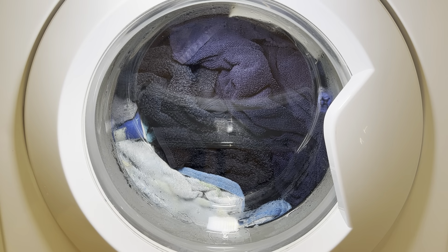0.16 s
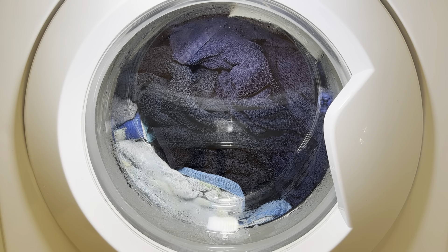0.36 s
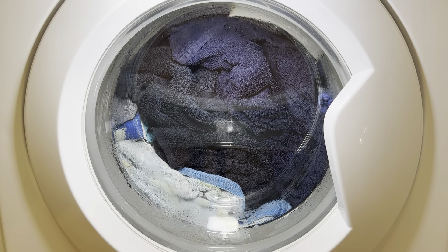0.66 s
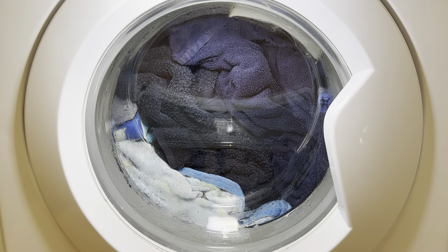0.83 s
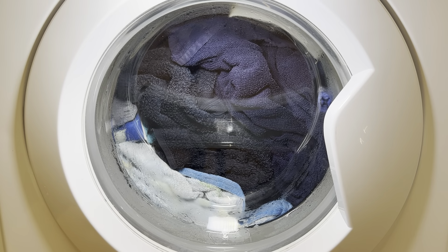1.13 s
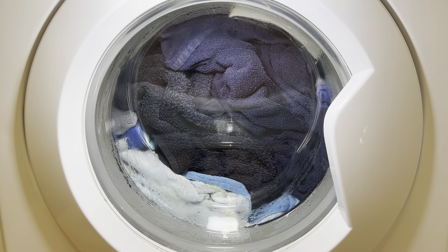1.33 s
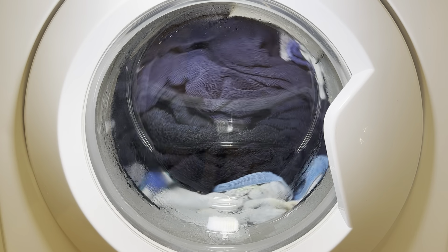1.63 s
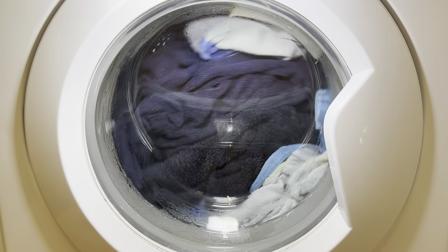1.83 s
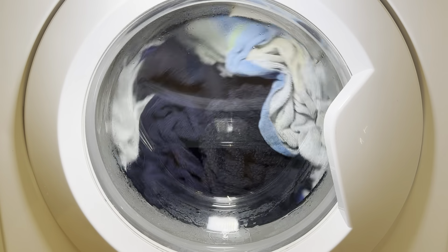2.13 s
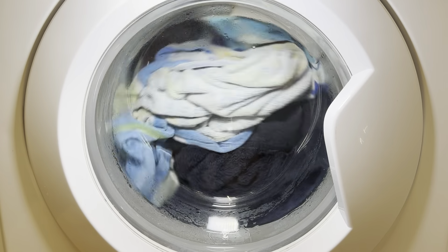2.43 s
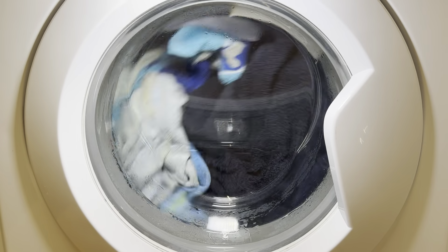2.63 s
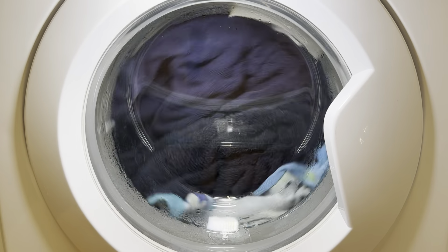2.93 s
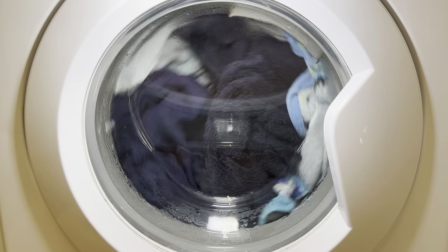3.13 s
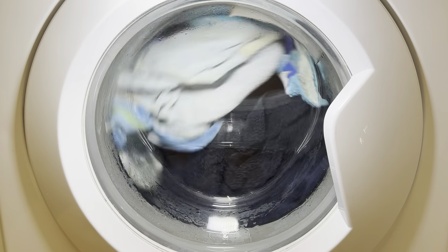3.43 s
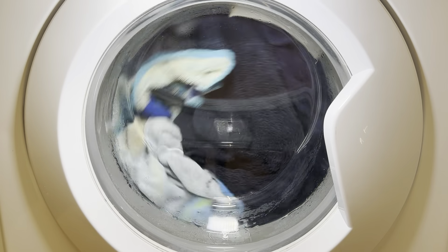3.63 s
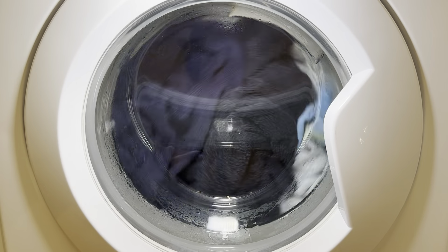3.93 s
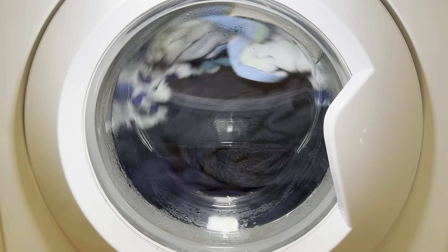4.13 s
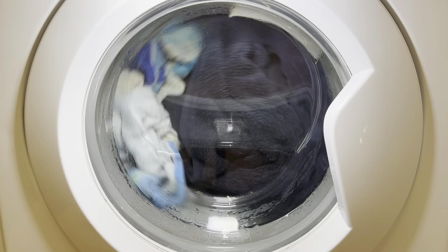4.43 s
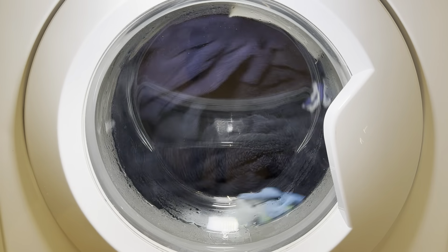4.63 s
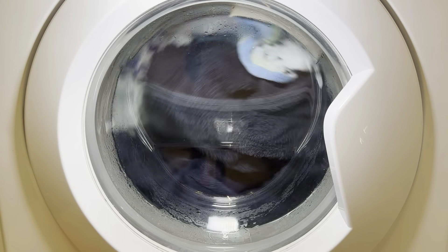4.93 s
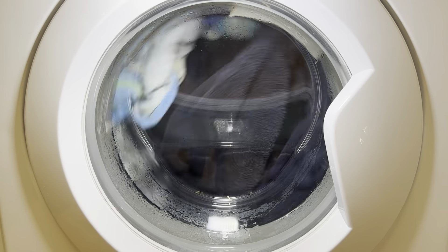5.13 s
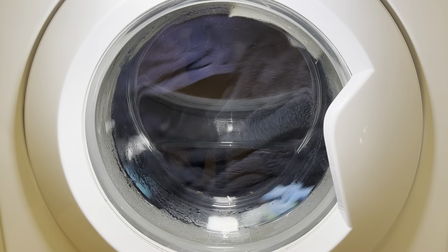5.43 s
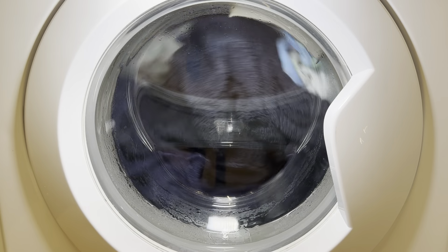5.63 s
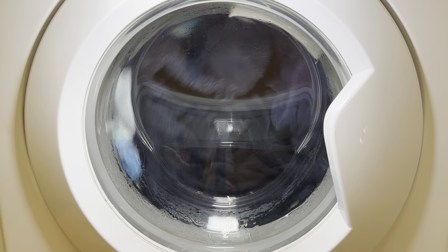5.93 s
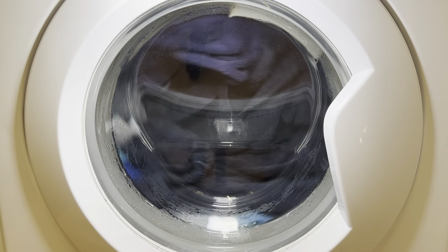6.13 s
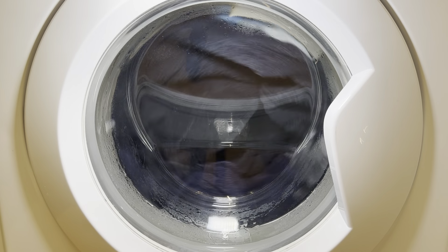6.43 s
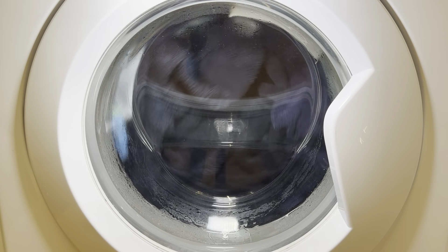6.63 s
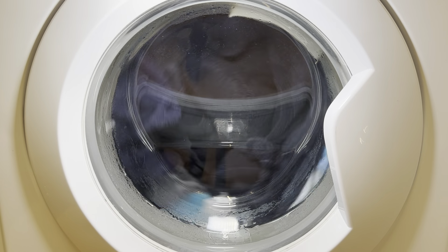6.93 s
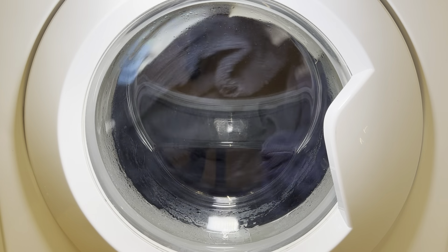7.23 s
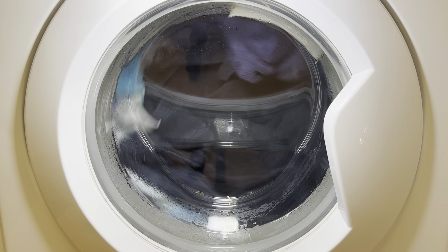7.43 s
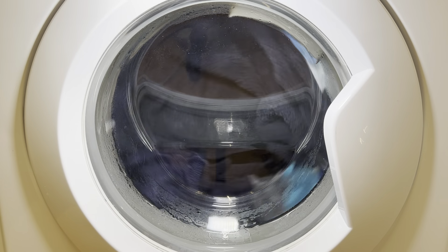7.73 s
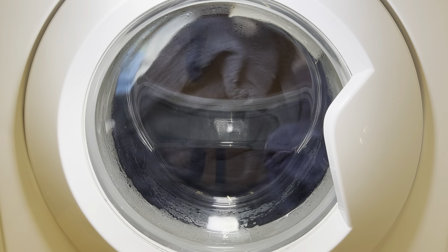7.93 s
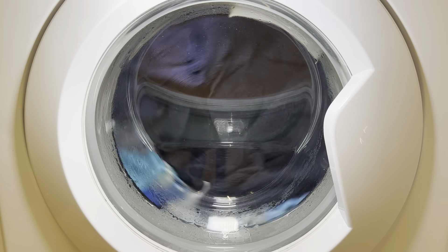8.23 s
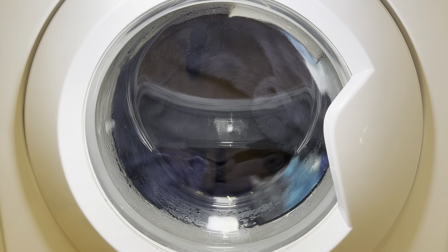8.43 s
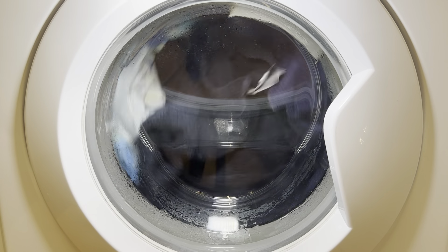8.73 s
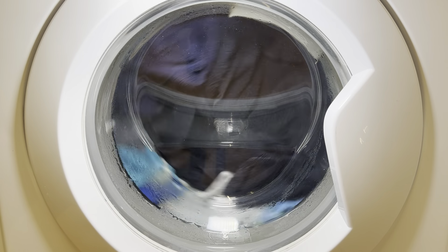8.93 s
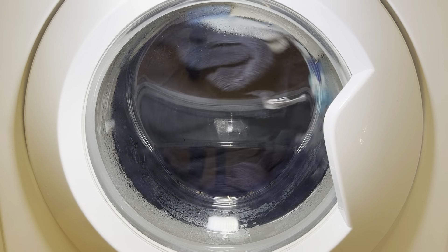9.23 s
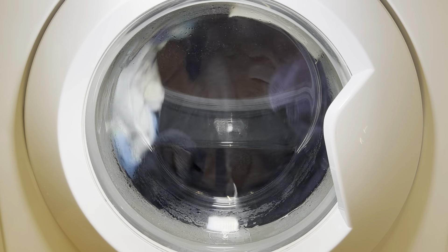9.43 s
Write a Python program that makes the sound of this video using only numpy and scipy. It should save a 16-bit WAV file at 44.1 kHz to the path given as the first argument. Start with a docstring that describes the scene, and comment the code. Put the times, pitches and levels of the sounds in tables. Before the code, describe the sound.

A laundry drum starts up, heard close in a small indoor room. First comes a low electric hum, airflow and a metallic latch clack, then a jolt and scrape. Cloth slaps, slides and thuds rhythmically against steel, with little zip taps and panel groans. A faint whine rises as the motor speeds up. After a rough knock halfway, the hum is stronger and steadier, until the load finally softens.

```python
"""A front-loading tumble dryer, with the microphone close to its door in a small room.
At rest it hums on mains harmonics in a rush of air, while a latch clacks and hard parts ring.
At 0.78 s the drum jolts round: filtered noise swishes and thuds at each roll, over deep booms,
and a faint motor whine climbs through a panel's resonance. From five seconds on the mains hum is
much louder, after a knock and clatter; near the end the laundry falls quiet."""
import sys
import numpy as np
from scipy import signal
from scipy.fft import rfft, irfft
from scipy.io import wavfile

SR = 44100
rng = np.random.default_rng(int(sys.argv[2]) if len(sys.argv) > 2 else 0)


def dump(signal):
    """Clip the signal to [-1, 1] and save it as 16-bit WAV at the path in sys.argv[1]."""
    limited = np.clip(np.atleast_2d(signal).T, -1, 1)
    pcm = np.round(limited * 32767).astype(np.int16)
    wavfile.write(sys.argv[1], SR, pcm)


N = 422478
TIME = np.arange(N) / SR
BINS_HZ = np.maximum(np.arange(N // 2 + 1) * SR / N, 1)
SIDES = np.array([[1], [-1]])  # left, right

MAINS_HZ = 49.95
START_S, LOAD_S, LULL_S = 0.78, 4.95, 9.39  # drum starts; full load comes on; laundry falls quiet

# the load rolls over about once a turn and is then lifted again:
# (t/s, spread of the swell/s, delay of the lift/s, boom level/dB, thud level/dB, slap level/dB)
LOAD_ROLLS = [(1.3, 0.095, 0.3, -48, -37, -43.5), (2.06, 0.096, .26, -50, -40, -44),
              (2.77, 0.061, 0.2, -51, -40, -42), (3.44, 0.092, 0.41, -47, -41.5, -43.5),
              (4.08, 0.083, .39, -46, -47, -46.5), (4.77, 0.072, 0.33, -42, -45, -44.5),
              (5.451, 0.097, 0.24, -44, -56, -46), (6.15, 0.084, .25, -46, -42, -46.5),
              (6.78, 0.11, 0.19, -44, -38.5, -46), (7.469, .075, .27, -43, -41.5, -46),
              (8.119, 0.096, 0.17, -45, -41, -47), (8.759, 0.093, 0.25, -45, -58, -50.5),
              (9.34, 0.077, .4, -53, -48, -53)]
# resonances of the cabinet's panels and cavities: (f/Hz, width/Hz, level/dB)
CABINET_MODES = [(112.4, 11.7, 14), (153, 4.8, -1.5), (179, 3.2, 13.5), (195, 3.3, -7), (263, 23, 10),
                 (291.8, 5.3, 11), (376, 8.3, 9), (359, 8.8, 9.5), (524, 25, 1.5), (622, 8.5, 1.5),
                 (804, 96, 0.5), (950, 17, 4)]
# resonances of the steel drum: (f/Hz, width/Hz, level/dB)
DRUM_MODES = [(918, 19, 7), (1183, 36, 3), (1261, 20, 9), (1650, 7.2, -4), (1557, 5.3, 9.5),
              (2035, 10.3, 16), (2168, 90, 13.5), (2470, 27, 9.5), (2626, 18, 6.5), (3160, 410, 3.5),
              (6300, 250, 3.5)]


def from_db(db):
    """Decibels to gain."""
    return 10 ** (np.asarray(db) / 20)


def rms_one(x):
    """Scale to unit rms."""
    return x / np.sqrt(np.mean(x ** 2) + 1e-20)


def in_time(rows):
    """Each column of a curve, sample by sample."""
    s, *columns = np.transpose(rows)
    return [np.interp(TIME, s, c) for c in columns]


def colour(points):
    """Gain at every frequency from (f/Hz, level/dB) points, straight on a log frequency axis."""
    hz, db = np.transpose(points)
    return from_db(np.interp(np.log(BINS_HZ), np.log(hz), db))


def resonances(modes):
    """Gain of a body whose modes stand out of a flat response."""
    power = 1
    for hz, width_hz, db in modes:
        power = power + from_db(db) ** 2 / (1 + (2 * (BINS_HZ - hz) / width_hz) ** 2)
    return np.sqrt(power)


def band(low_hz, high_hz):
    """Gain of a band with steep skirts."""
    return 1 / np.sqrt((1 + (low_hz / BINS_HZ) ** 8) * (1 + (BINS_HZ / high_hz) ** 8))


def peak_gain(hz, width_hz):
    """Gain of a narrow peak, for noise that whistles."""
    return 1 / (1 + (2 * (BINS_HZ - hz) / width_hz) ** 2)


def drift(rate_hz):
    """Slow chance with spread 1: noise that falls away above the rate."""
    spectrum = rfft(rng.standard_normal(N)) / (1 + (BINS_HZ / rate_hz) ** 2) ** 2
    return rms_one(irfft(spectrum, N))


def ramp(start_s, rise_s):
    """A step from 0 to 1."""
    return np.clip((TIME - start_s) / rise_s, 0, 1)


def burst(start_s, rise_s, t60):
    """A quick rise and an exponential fall (t60 in s)."""
    return ramp(start_s, rise_s) * from_db(-60 * np.maximum(TIME - start_s, 0) / t60)


def swell(centre_s, spread_s):
    """A smooth rise and fall of height 1."""
    return np.exp(-0.5 * np.minimum(((TIME - centre_s) / spread_s) ** 2, 100))


def flops(per_s=22, t60=0.28):
    """Folds of cloth land at random moments: each a sudden rise that dies away (t60 in s)."""
    landings = (rng.random(N) < per_s / SR) * np.minimum(rng.exponential(1, N), 2)
    return signal.lfilter([1], [1, -from_db(-60 / (t60 * SR))], landings + 1e-18)


def room_ripple(depth_db=2.6, grain_hz=22):
    """Overlapping reflections leave fine peaks and dips in a spectrum, deepening up to 4 kHz."""
    steps = np.interp(BINS_HZ / grain_hz, np.arange(4000), rng.standard_normal(4000))
    return from_db(depth_db * steps * np.clip(BINS_HZ / 4000, 0, 1))


def stereo_noise(gain, grain_db=0):
    """Coloured stereo noise, its width differing from band to band; grain makes the level flicker."""
    # left-right difference against their sum: (f/Hz, level/dB)
    side_colour = [(60, -67), (150, -12.5), (300, -11.5), (500, -2), (1000, -2), (1800, 2), (2300, -12.5),
                   (3200, -5), (4800, -4.5), (5800, 4.5), (7200, 10.5), (9500, -16.5), (12600, 13.5),
                   (15500, 1)]
    # left over right: (f/Hz, level/dB)
    left_over_right = [(100, 0), (200, -2), (400, 0.5), (650, -6.5), (1300, 2), (2500, 0), (5000, -3.5),
                       (9000, 0)]
    grains = rng.standard_normal((2, N)) * from_db(grain_db * drift(180))
    paths = np.array([room_ripple(), room_ripple() * colour(side_colour)])
    mid, side = irfft(rfft(grains) * gain * paths, N)
    pair = np.array([mid + side, mid - side]) / np.std(mid)
    lean = np.sqrt(colour(left_over_right))
    return irfft(rfft(pair) * np.array([lean, 1 / lean]), N)


def whine(hz, db, apart=0.65):
    """A thin tone that reaches the two sides out of step (apart in radians)."""
    phase = 2 * np.pi * np.cumsum(hz) / SR
    return np.sqrt(2) * from_db(db) * np.cos(phase + apart * SIDES)


def hum_strength(rest_db=-40.5, turning_db=-44, loaded_db=-32, flutter_db=0.8, steady_flutter_db=0.76):
    """The hum steps with the motor's state and surges whenever the load pulls on it."""
    # the motor strains against the shifting load: (t/s, spread/s, level/dB)
    hum_surges = [(.99, 0.063, -34.5), (1.355, 0.046, -33), (1.51, 0.022, -40), (1.61, 0.051, -37.5),
                  (2.11, 0.037, -31.5), (2.27, 0.048, -38), (2.38, 0.032, -35.5), (2.85, 0.019, -39),
                  (3.02, 0.061, -35), (3.38, .02, -54), (3.72, 0.034, -41), (3.81, 0.026, -40),
                  (4.22, 0.048, -39), (4.35, 0.031, -42), (4.46, 0.014, -36), (4.93, .025, -40),
                  (5, 0.011, -32), (5.08, 0.042, -34), (5.75, 0.076, -35.5), (6.38, .13, -46),
                  (6.97, 0.14, -43), (7.72, 0.084, -35), (8.42, 0.094, -40), (8.95, 0.034, -39),
                  (9.1, 0.026, -33)]
    turning, loaded = ramp(START_S, 0.054), ramp(LOAD_S, 0.14)
    unsettled = turning - loaded
    base = from_db(rest_db) * (1 - turning) + from_db(turning_db) * unsettled + from_db(loaded_db) * loaded
    surges = sum(from_db(db) * swell(s, spread_s) for s, spread_s, db in hum_surges)
    return (base + surges) * from_db((steady_flutter_db + flutter_db * unsettled) * drift(22))


def motor_hum(waver_db=3.0, sway=0.23, shake=0.41, spread=0.23, lag=0.039):
    """Magnetic hum on mains harmonics; the swaying cabinet makes the overtones waver (angles in radians)."""
    # overtones: (multiple of the mains, level at rest/dB, level turning/dB, level under full load/dB)
    overtones = [(3, -42.5, -50, -47), (4, -43.5, -55.5, -52), (5, -58, -53.5, -52), (6, -53.5, -51, -52),
                 (7, -60, -61, -52), (10, -82, -56, -56.5)]
    phase = 2 * np.pi * MAINS_HZ * TIME
    turning, loaded = ramp(START_S, 0.067), ramp(LOAD_S, 0.037)
    unsettled = turning - loaded
    # the hum's main tone lies at twice the mains frequency
    unrest = (shake + 0.41 * unsettled) * drift(4.7)
    out = hum_strength() * np.cos(2 * phase + unrest - lag * SIDES)
    motion = 0.35 + 0.65 * turning
    for multiple, rest_db, turn_db, load_db in overtones:
        level_db = rest_db * (1 - turning) + turn_db * unsettled + load_db * loaded
        wander = sway * multiple * motion * drift(5.6) + rng.uniform(0, 2 * np.pi)
        apart = spread * multiple / 4 * SIDES
        gain = from_db(level_db + waver_db * motion * drift(5.9))
        out = out + gain * np.cos(multiple * phase + wander + apart)
    return np.sqrt(2) * out


def idle_drone(waver_db=1.5):
    """Low tones beat against the hum until the drum starts."""
    # tones between the hum's overtones: (f/Hz, level/dB)
    idle_tones = [(125.4, -52), (180, -53)]
    tones = 0
    for hz, db in idle_tones:
        tone = np.sin(2 * np.pi * hz * TIME + rng.uniform(0, 2 * np.pi))
        tones = tones + from_db(db + waver_db * drift(3)) * tone
    return np.sqrt(2) * tones * (1 - ramp(START_S, 0.068))


def airflow(rush_db=-44, lull_db=-2, whistle_db=-74, whistle_from_s=4, whistle_hz=5100, whistle_width_hz=130):
    """Rush of air through the drum, with a thin whistle that fades in from the fourth second."""
    # broad colour of the rush under the drum's resonances: (f/Hz, level/dB)
    air_colour = [(25, -12), (60, 2.5), (120, 6), (175, 11.5), (230, -5.5), (330, 4.5), (480, -9),
                  (1000, -15), (2800, -22), (5000, -25), (7200, -37.5), (9000, -23.5), (11500, -33.5),
                  (15500, -54)]
    rush = stereo_noise(colour(air_colour) * resonances(DRUM_MODES), grain_db=1.0)
    whistle = stereo_noise(peak_gain(whistle_hz, whistle_width_hz))
    rush_gain = from_db(rush_db + lull_db * ramp(LULL_S, 0.07))
    return rush_gain * rush + from_db(whistle_db) * ramp(whistle_from_s, 1) * whistle


def knocks(tail=0.45, tail_t60=0.16, width_hz=300, rise_s=0.0008):
    """Hard parts tap the drum and cabinet: a sharp ring on one pitch, then a blurred tail from the room."""
    # knocks on the drum and cabinet: (t/s, level/dB, ring f/Hz, ring t60/s)
    taps = [(.066, -36, 2144, 0.037), (.077, -40, 1266, 0.14), (.093, -45, 2100, 0.055),
            (.118, -46, 1250, 0.1), (.96, -42, 2140, .08), (1.564, -45, 653, .12), (2.7, -37, 2215, 0.054),
            (2.742, -42, 2160, .07), (2.935, -46, 2200, .15), (4.96, -43, 975, 0.092),
            (4.994, -45, 2140, 0.089), (5.457, -41, 2250, 0.075), (6.41, -47, 2130, 0.09),
            (6.715, -47, 2180, .12), (8.805, -44, 2100, .09), (8.92, -49, 1260, .1), (8.974, -45, 780, .09),
            (9.12, -43.5, 914, 0.092), (9.549, -46, 2000, 0.064)]
    out, length = np.zeros((2, N)), SR // 3
    for s, db, hz, t60 in taps:
        span = slice(int(s * SR), int(s * SR) + length)
        age = np.arange(len(TIME[span])) / SR
        peak = signal.iirpeak(hz, hz / width_hz, fs=SR)
        noise = rng.standard_normal((2, len(age)))
        blur = signal.lfilter(*peak, signal.lfilter(*peak, noise))
        blur = rms_one(blur[0] + 1.3 * blur[1] * SIDES)  # sum and difference
        attack = np.minimum(age / rise_s, 1)
        ring = np.sqrt(2) * np.sin(2 * np.pi * hz * age) * attack * from_db(-60 * age / t60)
        out[:, span] += from_db(db) * (ring + tail * blur * from_db(-60 * age / tail_t60))
    return out


def start_up(clack_db=-38, rattle_db=-53, jolt_db=-39, scrape_db=-45.0, scrape_hold_s=0.066, scrape_release_s=0.18):
    """A latch clacks, rebounds and rattles faintly, then the drum jolts into motion and the load scrapes free."""
    # resonances of the latch: (f/Hz, width/Hz, level/dB)
    latch_modes = [(755, 140, 22), (1020, 200, -1), (1290, 150, 13.5), (1560, 160, 3), (2170, 150, 17),
                   (3200, 220, 8.5)]
    throw = burst(0.069, 0.012, 0.28) + 0.5 * burst(0.11, 0.002, 0.056)
    latch = from_db(clack_db) * throw * stereo_noise(band(470, 3700) * resonances(latch_modes))
    shiver = np.sin(np.pi * ramp(0.21, 0.59)) * (1 + 0.17 * np.cos(2 * np.pi * MAINS_HZ * TIME))
    rattle = from_db(rattle_db) * shiver * stereo_noise(band(950, 4400) * resonances(latch_modes))
    jolt_noise = stereo_noise(band(100, 270) * resonances(CABINET_MODES))
    jolt = from_db(jolt_db) * burst(0.777, 0.004, 0.92) * jolt_noise
    slip = ramp(0.777, 0.0032) - ramp(START_S + scrape_hold_s, scrape_release_s)
    scrape = from_db(scrape_db) * slip * stereo_noise(band(480, 1360), grain_db=1.5)
    return latch + rattle + jolt + scrape


def ticks(t60=0.059, tail=0.39, tail_t60=0.2):
    """A tiny bright tick with a short room tail."""
    # contacts switching: (t/s, level/dB)
    contacts = [(0.613, -48), (4.957, -54)]
    blows = 0
    for s, db in contacts:
        blows = blows + from_db(db) * (burst(s, 0.001, t60) + tail * burst(s, 0.005, tail_t60))
    ring = band(9600, 11000) * resonances([(10000, 1000, 3.6), (15400, 980, 4.4)])
    return blows * rms_one(irfft(rfft(rng.standard_normal(N)) * ring, N))


def groans(flutter_hz=14):
    """A side panel swells into resonance for a moment."""
    # the cabinet groans when the load pulls on it: (t/s, spread/s, level/dB, centre f/Hz)
    pulls = [(.8, 0.017, -31.5, 164), (.88, 0.027, -32, 172.8), (.96, 0.022, -35, 195),
             (1.41, 0.015, -34, 178), (1.61, 0.02, -36, 178), (1.86, 0.03, -37, 195.7),
             (2.11, 0.067, -38.5, 205), (2.23, 0.055, -33, 181), (2.6, .05, -40, 200),
             (4.9, 0.03, -37, 181), (5.75, 0.017, -41, 178), (6.35, 0.14, -41, 175.5),
             (6.85, 0.12, -40.5, 177.2), (8.92, 0.065, -38, 178.6)]
    out = 0
    for s, spread_s, db, hz in pulls:
        tone = np.sin(2 * np.pi * hz * TIME + rng.uniform(0, 2 * np.pi))
        out = out + from_db(db) * swell(s, spread_s) * tone
    return out * (1 + 0.2 * drift(flutter_hz))


def laundry(weight_db=-42.5, rub_db=-57, flop=0.41, buzz=0.067, lurch_db=0.62,
            first_slide_s=0.85, first_spread_s=0.1, first_weight_db=-43, first_rub_db=-58,
            roll_rub_db=-67, thud_after_s=0.047, thud_spread_s=0.06, lull_rumble_db=-6, lull_rub_db=-13):
    """The load's weight shakes the cabinet while cloth and zips rub along the steel drum, most at each roll."""
    # broad colours under the resonances of cabinet and drum: (f/Hz, level/dB)
    rumble_colour = [(30, -26), (50, 0), (85, -2.5), (120, -7.5), (175, -3.5), (225, -11.5), (300, -3.5),
                     (400, -4), (550, -10.5), (850, -12), (1100, -32), (2000, -59)]
    swish_colour = [(400, -34), (900, 3.5), (1400, 1.5), (1800, 6), (2500, 4), (3300, 4.5), (5000, 4),
                    (5600, -3.5), (7200, -14), (8500, 1), (11000, -4.5), (13000, -27), (16000, -9)]
    slide, lull = swell(first_slide_s, first_spread_s), ramp(LULL_S, 0.24)
    drag = from_db(rub_db) * (0.5 + 0.5 * ramp(START_S, 0.87))  # grows as the drum gathers speed
    thuds, rub = 0, drag + from_db(first_rub_db) * slide
    for s, spread_s, _, _, thud_db, _ in LOAD_ROLLS:
        thuds = thuds + from_db(thud_db) * swell(s + thud_after_s, thud_spread_s)
        rub = rub + from_db(roll_rub_db) * swell(s, spread_s)
    weight = np.hypot(from_db(weight_db) + from_db(first_weight_db) * slide, thuds)
    weight = weight * from_db(lurch_db * drift(20.0) + lull_rumble_db * lull)
    rumble = weight * stereo_noise(colour(rumble_colour) * resonances(CABINET_MODES), grain_db=0.5)
    rub = rub * from_db(lull_rub_db * lull) * (1 + flop * flops())
    swish = rub * stereo_noise(colour(swish_colour) * resonances(DRUM_MODES), grain_db=0.5)
    tremble = 1 + buzz * np.cos(4 * np.pi * MAINS_HZ * TIME)  # the motor's vibration chops the rubbing
    return ramp(START_S, 0.0072) * (rumble + swish * tremble)


def motor_whine(panel_hz=770.5, panel_width_hz=42, jitter=0.002, hunting=0.0092, waver_db=2.9,
                fan_jitter_hz=0.97, direct_db=-15, casing_hz=885):
    """Multiples of the rotation sing in turn as they climb through a panel's resonance; a fan tone joins."""
    # the motor runs up to speed: (t/s, rotation f/Hz)
    run_up = [(.78, 30), (1.5, 48.05), (2.1, 58.97), (2.8, 70.5), (3.3, 78.2), (4, 84.65), (4.6, 89.6),
              (5.1, 93.1), (5.5, 97.6), (6.05, 102.5), (6.45, 103.8), (6.8, 105.6), (7.3, 105.8),
              (8.2, 102.8), (9.1, 102.4), (9.58, 103)]
    # how hard the motor sings as it gains speed and then eases: (t/s, level/dB)
    singing = [(.78, -17), (1.6, -9), (2.2, -8), (2.9, -2), (4, -3.5), (5, -4), (5.6, 3), (6.35, 3.5),
               (6.8, 1), (7.6, -2), (9.58, -2)]
    # whine: (multiple of the rotation, level at the panel's resonance before the effort/dB)
    orders = [(7, -57.5), (8, -49), (9, -51), (10, -56), (11, -52), (12, -49), (13, -48), (14, -43),
              (15, -46)]
    # fan tone: (t/s, f/Hz, level/dB)
    fan_curve = [(5.2, 766, -88), (5.6, 739, -60), (6.6, 759, -53), (7.6, 759, -55.5), (9.58, 765, -58)]
    speed_hz, effort_db = in_time(run_up)[0], in_time(singing)[0]
    slow = 1 - ramp(START_S, 3.5) ** 2
    rotation_hz = speed_hz * (1 + jitter * drift(7.7) + hunting * slow * drift(16.6))  # unsteady at low speed
    out = 0
    for multiple, db in orders:
        hz = multiple * rotation_hz
        panel = 1 / np.hypot(1, 2 * (hz - panel_hz) / panel_width_hz)
        casing = 1 / np.hypot(1, (hz / casing_hz) ** 10)  # higher tones stay inside
        flicker_db = waver_db * drift(9.8)
        body = np.hypot(panel, from_db(direct_db)) * casing
        out = out + whine(hz, db + effort_db + flicker_db) * body
    fan_hz, fan_db = in_time(fan_curve)
    return ramp(START_S, 0.05) * out + whine(fan_hz + fan_jitter_hz * drift(8.8), fan_db)


def small_taps(level_db=-55, per_s=22, t60=0.085):
    """Zips and seams patter lightly on the steel and keep its ring flickering."""
    ring = stereo_noise(band(2300, 2350) * resonances(DRUM_MODES))
    present = ramp(START_S, 0.14) - ramp(LULL_S, 0.13)
    return from_db(level_db) * present * flops(per_s, t60) * ring


def slides(half_width_octaves=0.7, catch_db=1.5):
    """Each piece of cloth slips over the steel in a grainy rush, catching as it goes."""
    # pieces of cloth, each with a brightness of its own: (t/s, spread/s, level/dB, centre f/Hz)
    pieces = [(1, .03, -53, 3000), (1.315, 0.061, -46.5, 2530), (1.7, 0.099, -64, 4800),
              (2.05, 0.033, -49, 2700), (2.74, 0.083, -50.5, 3000), (3.4, 0.092, -52, 2900),
              (3.92, 0.033, -53, 2900), (4.12, 0.05, -47.5, 2870), (4.68, .1, -57.5, 3900),
              (5.37, 0.059, -54.5, 4280), (6.15, 0.074, -53, 3300), (6.76, 0.084, -51, 2800),
              (7.46, .06, -51, 3440), (8.09, .08, -57, 3500), (8.72, 0.12, -52, 3330),
              (9.36, 0.03, -51, 4400)]
    friction = stereo_noise(band(1200, 5100) * resonances(DRUM_MODES), grain_db=1.5)
    out, reach = np.zeros((2, N)), SR // 2
    for s, spread_s, db, hz in pieces:
        span = slice(max(int(s * SR) - reach, 0), int(s * SR) + reach)
        edges_hz = hz * 2.0 ** (half_width_octaves * np.array([-1, 1]))
        edges_hz = np.clip(edges_hz, 100, SR / 2 - 100)
        sections = signal.butter(2, edges_hz, "band", fs=SR, output="sos")
        rush = signal.sosfilt(sections, friction[:, span])
        out[:, span] += from_db(db) * swell(s, spread_s)[span] * rms_one(rush)
    return out * from_db(catch_db * drift(19))


def rolls(low_hz=46, climb_hz_per_s=45, length_s=0.614, rough=0.4, slap_after_s=0.039,
          lift_slap_db=-11, lift_spread_s=0.16):
    """Each roll is a soft slap of cloth, a fainter one at the lift, and a deep boom that climbs in pitch."""
    boom, fall = np.zeros(N), np.zeros(N)
    for s, spread_s, lift_after_s, boom_db, _, slap_db in LOAD_ROLLS:
        age = np.clip(TIME - s + 0.1196, 0, length_s)  # the boom begins ahead of the slap
        phase = 2 * np.pi * (low_hz * age + climb_hz_per_s * age ** 3 / (3 * length_s))
        arch = np.sin(np.pi * age / length_s)
        boom += from_db(boom_db) * arch * np.sin(phase + rng.uniform(0, 2 * np.pi))
        slap = swell(s + slap_after_s, spread_s)
        lift = from_db(lift_slap_db) * swell(s + lift_after_s, lift_spread_s)
        fall += from_db(slap_db) * (slap + lift)
    cloth = stereo_noise(band(920, 1990) * resonances(DRUM_MODES), grain_db=1.5)
    slaps = fall * (0.39 + 0.24 * flops(40, 0.075)) * cloth
    return boom * (1 + rough * drift(22)) + slaps


def scrapes(rise_s=0.017, release_s=0.061):
    """A fold catches, drags over the steel with a rough grain and lets go."""
    # folds of cloth scrape along the drum wall: (t/s, length/s, level/dB)
    folds = [(1.337, 0.043, -57), (1.545, 0.082, -52), (1.77, 0.081, -56), (2.004, 0.035, -48),
             (2.152, .04, -60), (2.27, 0.06, -51), (2.91, 0.078, -53), (4.278, 0.025, -50.5),
             (5.408, 0.054, -58)]
    drag = 0
    for s, length_s, db in folds:
        drag = drag + from_db(db) * (ramp(s, rise_s) - ramp(s + length_s, release_s))
    return drag * stereo_noise(band(410, 1400) * resonances(DRUM_MODES), grain_db=4)


def seal_hiss(level_db=-68, whistle_db=-69, from_s=1.43, whistle_hz=9530, width_hz=160):
    """A steady hiss with a thin whistle in it comes with the turning drum, as of its rim on the seal."""
    hiss = from_db(level_db) * stereo_noise(band(8200, 10300), grain_db=4.0)
    whistle = from_db(whistle_db) * stereo_noise(peak_gain(whistle_hz, width_hz))
    return (ramp(from_s, 0.18) - ramp(LULL_S, 0.099)) * (hiss + whistle)


def passing_tones(waver_db=3.5, wobble=0.003):
    """Faint wavering tones, one low and one high, that fade in and out."""
    # the tones: (t/s, length/s, f/Hz, level/dB)
    faint_tones = [(3.95, 1.2, 638, -62), (6.35, 1.15, 2607, -66)]
    out = 0
    for s, length_s, hz, db in faint_tones:
        present = ramp(s, 0.08) - ramp(s + length_s, 0.11)
        out = out + present * whine(hz * (1 + wobble * drift(7.5)), db + waver_db * drift(7))
    return out


def clunk(strike_s=4.956, strike_db=-41.5, strike_t60=0.16, clatter_db=-52, clatter_t60=0.35,
          answer_s=5.5, answer_db=-44.0, answer_t60=0.33):
    """As the full load comes on, a rough knock sets the drum clattering and the cabinet answers dully."""
    strike = from_db(strike_db) * burst(strike_s, 0.0087, strike_t60) * stereo_noise(band(770, 970))
    clatter_noise = stereo_noise(band(2000, 2600), grain_db=-1)
    clatter = from_db(clatter_db) * burst(strike_s, 0.0087, clatter_t60) * clatter_noise
    answer_noise = stereo_noise(band(420, 820) * resonances(CABINET_MODES))
    answer = from_db(answer_db) * burst(answer_s, 0.0024, answer_t60) * answer_noise
    return strike + clatter + answer


def scene():
    """Motor, air and tumbling load together."""
    motor = motor_hum() + idle_drone() + motor_whine() + passing_tones()
    load = groans() + laundry() + small_taps() + slides() + rolls() + scrapes()
    blows = knocks() + start_up() + ticks() + clunk()
    return motor + airflow() + seal_hiss() + load + blows


def record(dry, low_cut_hz=36, cutoff_hz=15800):
    """The deepest bass and the top are cut."""
    pair = signal.sosfilt(signal.butter(4, low_cut_hz, "high", fs=SR, output="sos"), dry)
    return signal.sosfilt(signal.ellip(10, 0.1, 80, cutoff_hz, fs=SR, output="sos"), pair)


dry = scene()
out = record(dry)
dump(out)
```